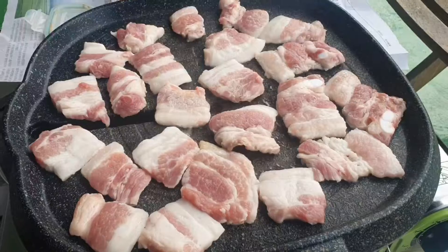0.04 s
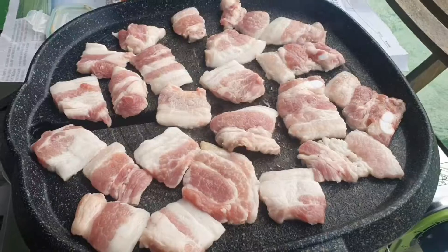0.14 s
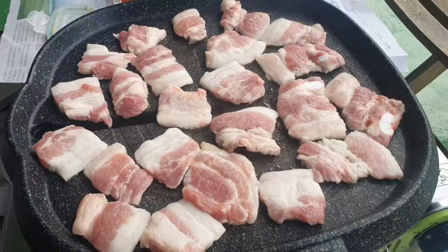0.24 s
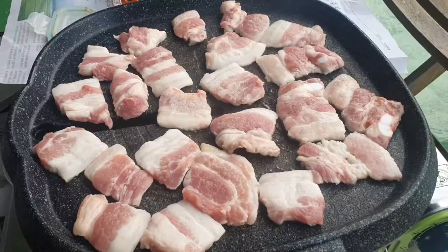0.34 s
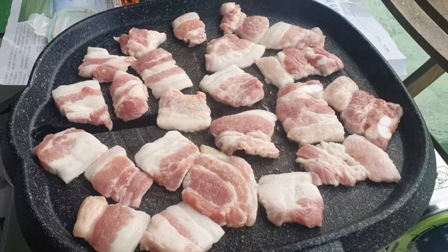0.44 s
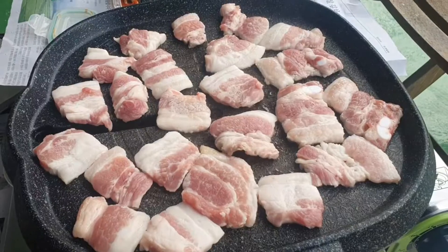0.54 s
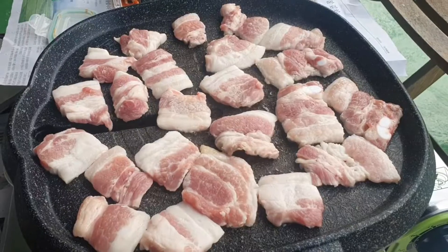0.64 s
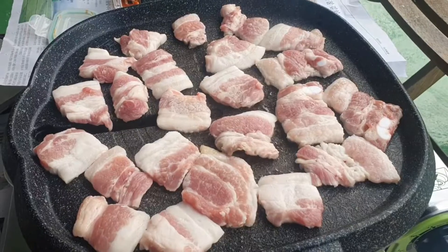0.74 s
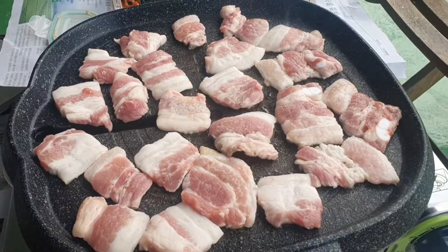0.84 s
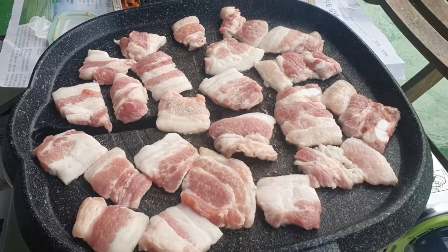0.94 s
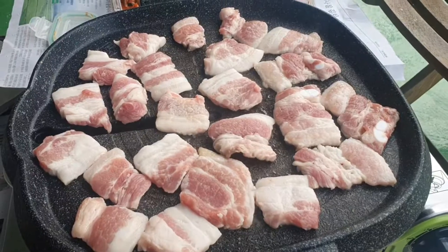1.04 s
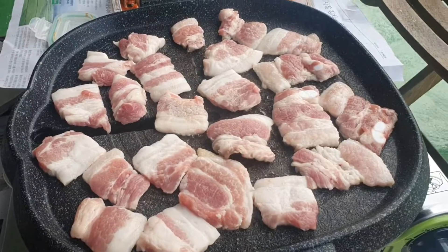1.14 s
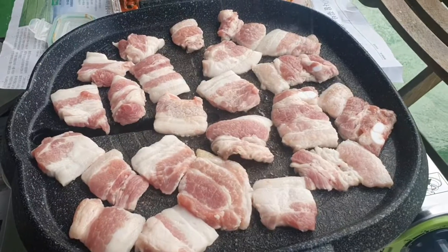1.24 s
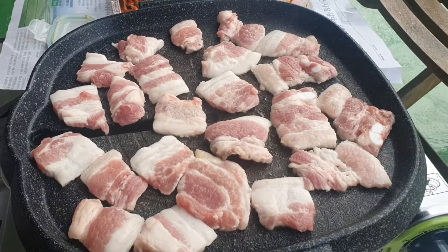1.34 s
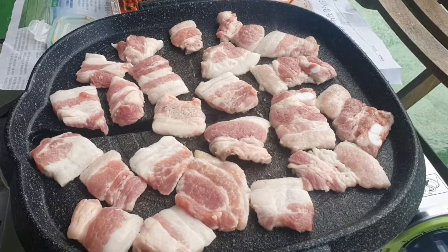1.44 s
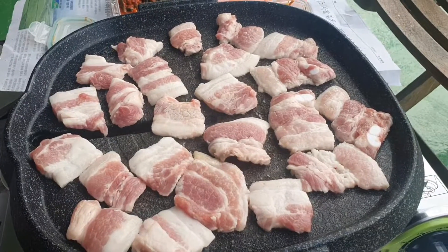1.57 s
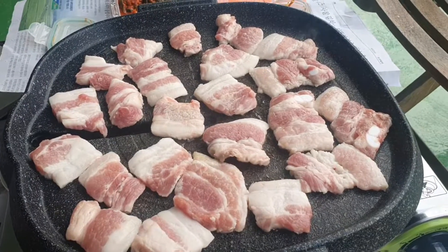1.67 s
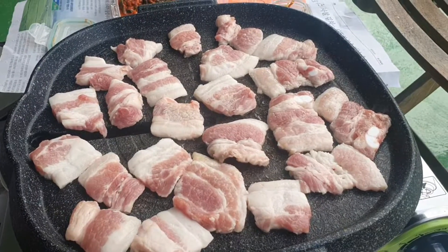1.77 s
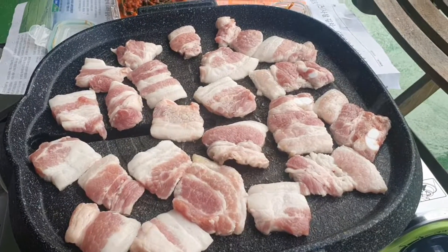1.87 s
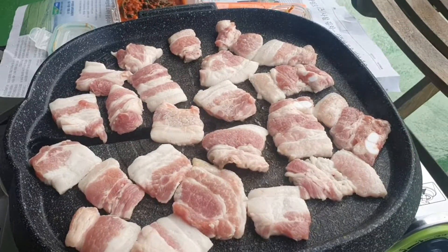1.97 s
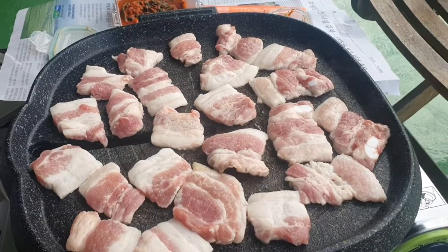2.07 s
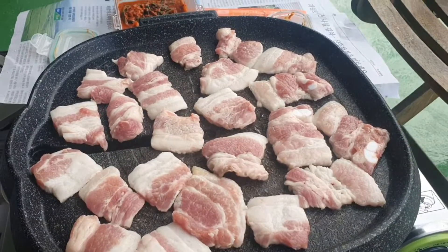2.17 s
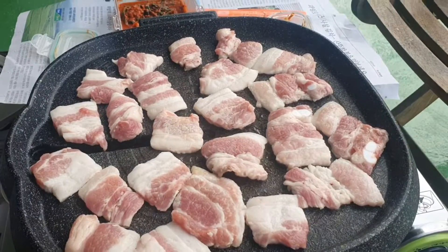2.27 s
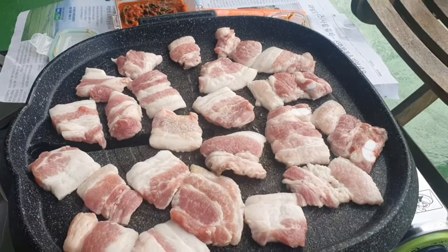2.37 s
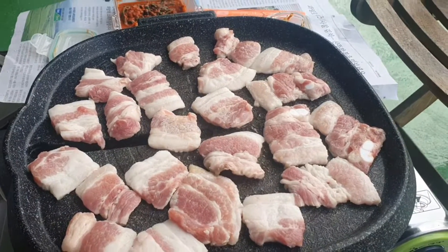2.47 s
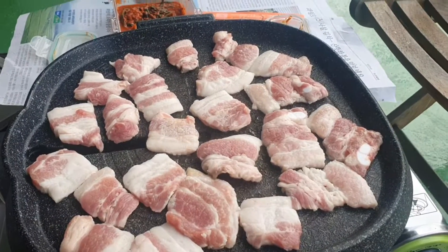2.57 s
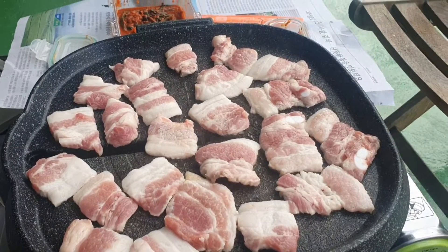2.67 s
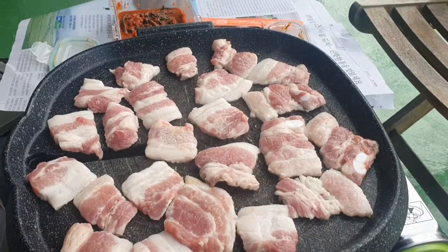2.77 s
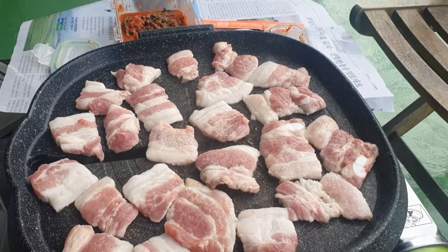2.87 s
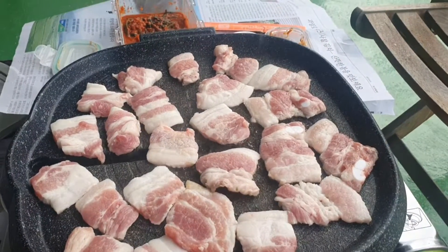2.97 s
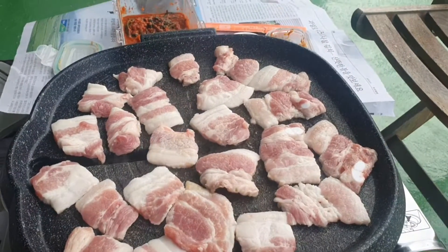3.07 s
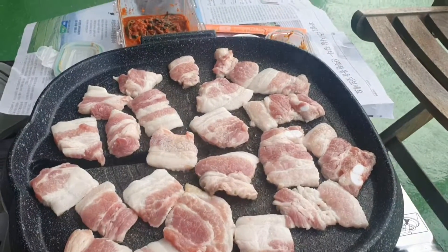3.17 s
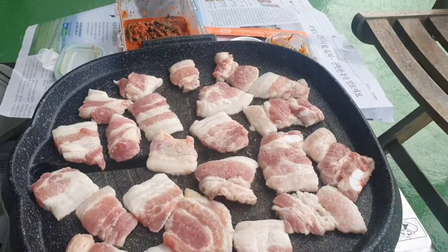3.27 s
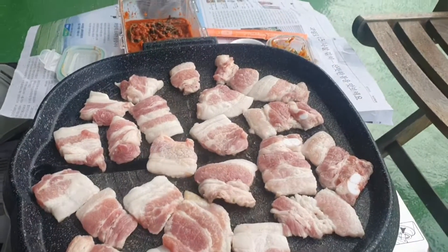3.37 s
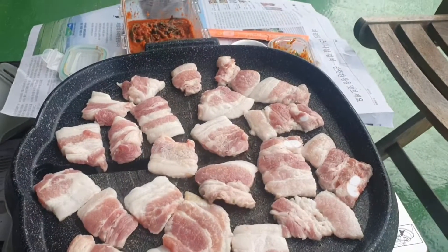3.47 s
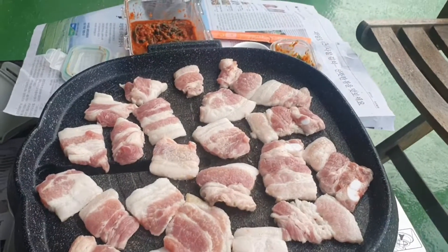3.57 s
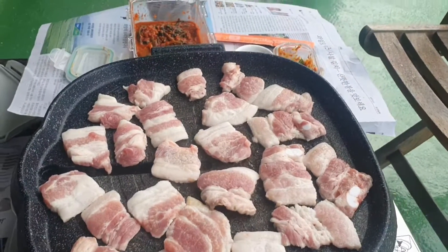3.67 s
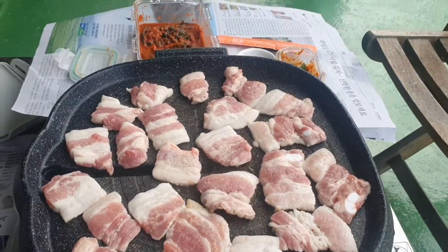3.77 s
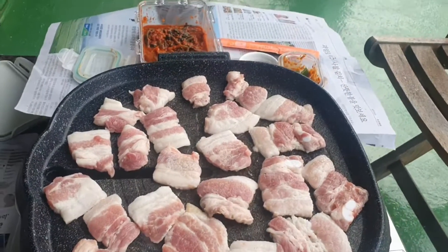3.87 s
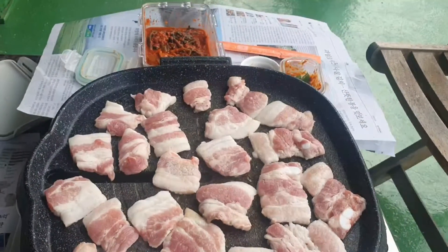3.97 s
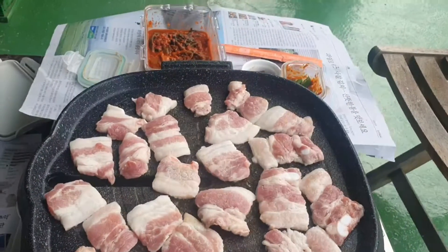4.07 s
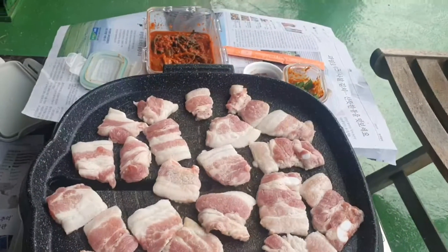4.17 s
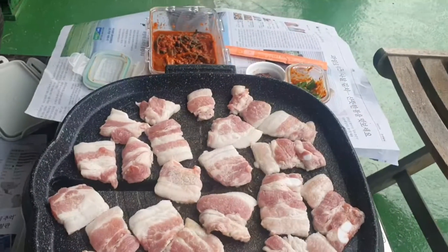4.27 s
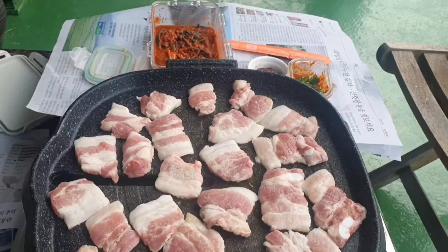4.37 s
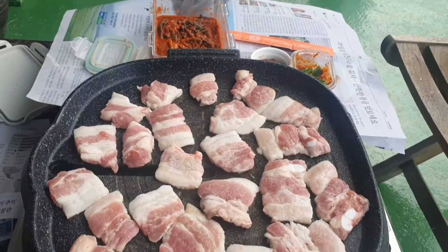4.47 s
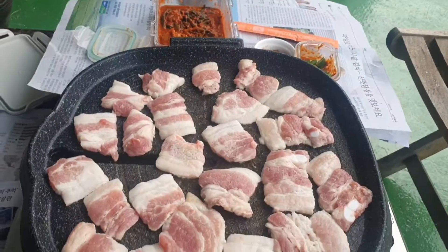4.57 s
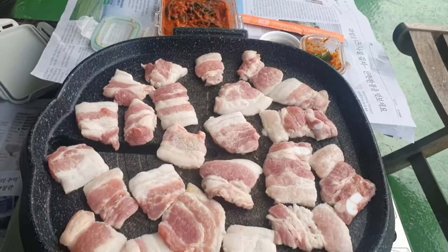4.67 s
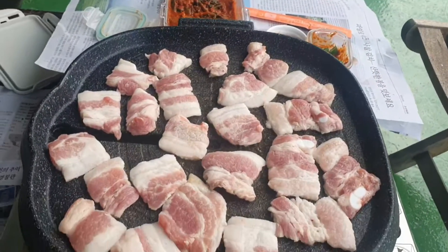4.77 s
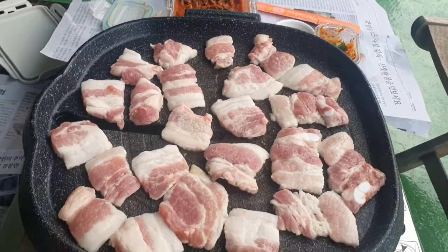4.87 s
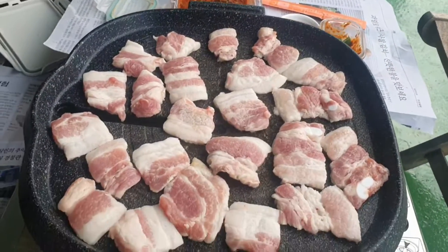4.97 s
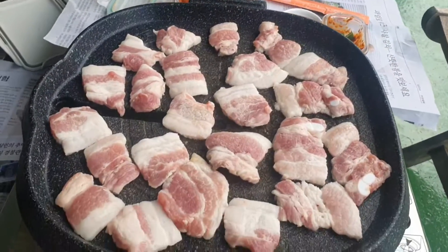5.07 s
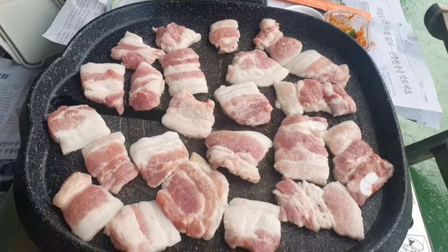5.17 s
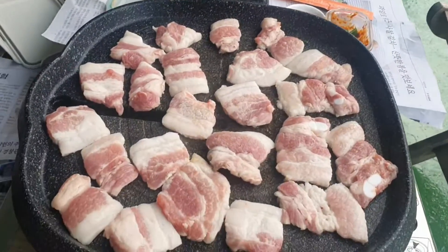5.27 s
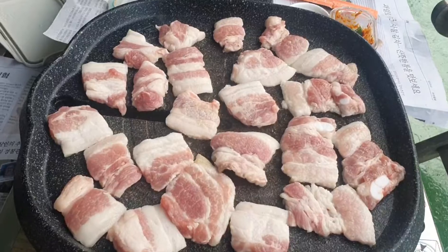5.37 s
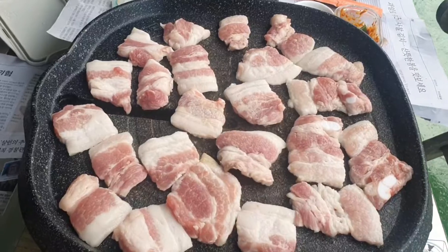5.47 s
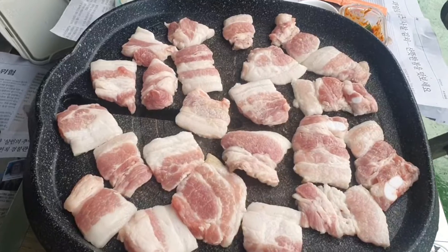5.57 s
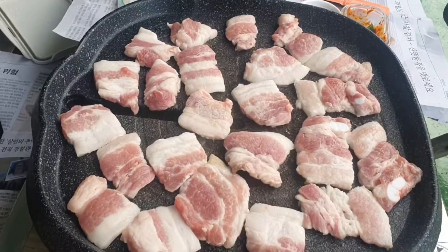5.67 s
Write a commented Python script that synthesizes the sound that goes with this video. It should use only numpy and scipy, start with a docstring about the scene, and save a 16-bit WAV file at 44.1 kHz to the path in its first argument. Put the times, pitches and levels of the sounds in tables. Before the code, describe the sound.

Pork belly slices fry on a stone pan outdoors, a steady bright hiss with fine crackles and spits that grow sharper midway.

```python
"""A near-silent instant, then the fizz of pork belly slices on a stone grill pan outdoors cuts in.
It is countless tiny steam bursts, heard close up through a two-port microphone; the sound drops out once.
Larger bubbles ring in the fat under the slices, slow ones plop, and a low outdoor rumble lies beneath.
Single drops spit as short damped rings; later, trapped steam squirts out as fading bubbly rushes."""
import sys
import numpy as np
from scipy import signal
from scipy.fft import rfft, irfft, next_fast_len
from scipy.io import wavfile
from scipy.ndimage import uniform_filter1d, minimum_filter1d, map_coordinates

SR = 44100
rng = np.random.default_rng(int(sys.argv[2]) if len(sys.argv) > 2 else 0)


def put_to_file(sound):
    """Save the sound as 16-bit audio at rate SR, in the file named by the first command-line argument."""
    columns = np.atleast_2d(sound).T  # one column per channel
    safe = np.clip(columns, -1, 1)
    whole_steps = np.round(safe * 32767)
    wavfile.write(sys.argv[1], SR, whole_steps.astype(np.int16))


N = 252252

# Levels marked "drive" are offset in the layer's function.
# sound cuts in, drops out once: [time_s, gain_db]
HEARD_GAIN = [(.143, -59), (.145, 2), (.431, 1), (.434, -30), (.453, -36), (.456, 1.5)]
# how hard the whole pan fries: [time_s, drive_db]
FRYING_DRIVE = [(0.18, -34), (0.42, -36.0), (0.66, -34.5), (0.98, -35.5), (1.14, -33), (1.22, -33.5),
                (1.62, -29.0), (2.62, -28.0), (2.7, -29.5), (2.94, -28.5), (3.02, -24.5), (3.1, -30.0),
                (3.74, -31.0), (3.9, -33), (4.02, -31), (4.06, -31.5), (4.98, -28.0), (5.68, -27.5)]
# fizz spectrum: [frequency_hz, density_db_per_hz]
FIZZ_SPECTRUM = [(300, -27), (600, -8.5), (1000, -9), (1500, -4.5), (2200, -1.5), (3500, 2.5), (5400, -3),
                 (6400, -1.5), (7400, -5.5), (8400, -1.5), (11500, -1), (13500, -1.5), (15700, -4)]
# how hard the fat boils beneath the slices: [time_s, drive_db]
BUBBLING_DRIVE = [(0.18, -38.5), (1.26, -45.5), (1.46, -34), (1.7, -38.5), (1.82, -29), (2.1, -38),
                  (2.22, -25.5), (2.38, -36.5), (2.82, -26), (2.94, -31.5), (3.18, -27), (3.5, -34.5),
                  (3.62, -31.5), (4.1, -41.0), (4.46, -32.5), (5.5, -42), (5.58, -27.5), (5.68, -35.5)]
# hollows between meat and pan: [resonance_hz, width_hz, gain_db]
HOLLOW_MODES = [(1770, 490, -8), (2830, 290, -2), (3370, 146, 3), (3640, 320, -8), (4210, 490, 0.5)]
# plop filter, the fat carries no bass: [frequency_hz, gain_db]
PLOP_GAIN = [(300, -46), (480, -22), (750, -1.5), (1000, -4.5), (4000, 2.5)]
# stereo lean of the frying, positive is left: [frequency_hz, left_minus_right_db]
STEREO_TILT = [(60, -9), (110, 2), (200, -11), (380, -10), (700, -0.5), (1290, -2), (2380, -1.0),
               (4400, -1.5), (8120, 2.5), (15000, 3.0)]
# outdoor rumble: [time_s, drive_db]
RUMBLE_DRIVE = [(0.18, -46.5), (0.78, -47.5), (1.92, -39.5), (2.64, -40.5), (2.82, -44.5), (4.14, -44),
                (4.92, -39.5), (5.68, -40)]
# rumble spectrum: [frequency_hz, density_db_per_hz]
RUMBLE_SPECTRUM = [(15, -30), (30, -9), (45, -1.5), (90, 0.5), (125, -.5), (152, -6), (188, -3.5),
                   (260, -8), (400, -10.5), (500, -16), (800, -14.5), (1300, -22), (2500, -31)]
# loudest bursting drops, ring drive as rms over 3 ms:
# [start_s, ring_drive_db, ring_hz, plop_over_ring_db, plop_hz, snap_over_ring_db]
LOUD_SPITS = [(0.798, -37, 3910, -8, 1520, 7), (0.823, -33.5, 3180, -2, 1420, 1),
              (1.103, -41, 3850, -1, 1550, 13), (1.429, -30, 3720, -4, 940, 8.5),
              (1.462, -23.5, 3680, -7, 1440, -7), (1.601, -26, 3650, -10, 1580, 6),
              (1.696, -30.5, 4610, -8, 1500, 9.5), (1.757, -26, 3390, 0, 1270, 1),
              (1.855, -32, 2970, -4, 1780, -3), (1.984, -27, 3000, -1, 1370, -9),
              (2.164, -28, 3070, -5, 1490, 0), (2.269, -25, 4120, -13, 1370, 2),
              (2.457, -12, 4600, -13, 1110, -6), (2.468, -20, 4270, 0, 1260, -6),
              (2.539, -25, 3860, -7, 1470, -5), (2.641, -22.5, 3230, -11.5, 1640, -8),
              (2.683, -22, 3570, -15, 1740, -1.5), (2.729, -5.5, 3130, -10.5, 1590, -11),
              (2.806, -22, 3570, -12, 1570, -3), (2.971, -26.5, 3160, -1.5, 1480, 1),
              (2.985, -28.5, 3290, -1, 1430, 5), (3.02, -15.5, 3600, -11, 1690, -6),
              (3.058, -12.5, 3670, -22, 1640, -4), (3.118, -26, 3510, -3.5, 1270, -8),
              (3.2, -21.5, 3490, -8.5, 1610, -1), (3.328, -17.5, 3370, -12.5, 1650, -18),
              (3.387, -21.5, 3040, -4, 1480, -7), (3.394, -25, 3360, -16, 1730, -1),
              (3.644, -22.5, 3310, -14, 1590, -16), (4.015, -32.5, 4290, -3, 1450, 10.5),
              (4.296, -21, 2530, -19, 1930, -1), (4.332, -25, 3460, -14, 1640, -8),
              (4.429, -21.5, 3580, -9, 1620, -6), (4.476, -19, 3340, -17, 1690, -13),
              (4.603, -24, 3500, -18, 1570, -13), (4.69, -33, 3160, 6.5, 1130, 7),
              (4.829, -19.5, 3320, -14, 1600, -12), (4.922, -27, 2740, -3, 1390, -6),
              (4.969, -27.5, 3930, -11, 1500, 3.5), (5.553, -25, 3520, -10, 1400, -1)]
# steam from under a slice: [start_s, level_db, pitch_hz, width_hz, fall_time_s, left_minus_right_db]
STEAM_SQUIRTS = [(1.835, -28.5, 3300, 1500, .045, 0), (2.466, -21, 4200, 4000, 0.023, -5),
                 (2.635, -27, 3430, 700, 0.022, -8), (2.737, -12, 3180, 900, 0.023, -6.5),
                 (3.020, -23.5, 3800, 1100, 0.041, 0), (3.058, -25.5, 3550, 500, 0.085, -3),
                 (3.328, -25.5, 3500, 600, 0.035, -4), (3.386, -27.5, 3500, 800, 0.026, 0),
                 (3.633, -28, 3450, 500, 0.037, 0)]

TOP_HZ = 15850
FIZZ_OVER_FRYING_DB = 0.46
# plop level at the reference drive; dB more per dB of frying
SPUTTER_DB, SPUTTER_REF_DRIVE_DB, SPUTTER_DB_PER_DB = -48.5, -29.5, 0.87
SPUTTER_SWING_DB, SPUTTER_SWINGS_PER_S = 2.1, 7
SMALL_SPITS_PER_S = 6
# ring drive over frying drive; plop and snap over ring
SMALL_RING_DRIVE_DB, SMALL_PLOP_DB, SMALL_SNAP_DB = -4, -8, -1
SMALL_RING_HZ, SMALL_PLOP_HZ = 3550, 1600
SMALL_SCATTER_DB, SMALL_SCATTER_OCTAVES = 1.8, .22
RIGHT_PORT_DELAY_S = .00021
SPIT_LEFT_MINUS_RIGHT_DB, SNAP_LEFT_MINUS_RIGHT_DB = 2, 6
SPIT_HOLLOW_DB = -9


def amp(db):
    """Decibels to gain."""
    return 10 ** (np.asarray(db) / 20)


def unit(x):
    """Scale to rms 1."""
    return x / np.sqrt(np.mean(x ** 2) + 1e-20)


def along(points, hz):
    """Interpolate (Hz, value) points on a log-frequency axis."""
    f, v = np.transpose(points)
    return np.interp(np.log(hz + 1), np.log(f + 1), v)


def curves(rows):
    """One value per sample for each column after the time."""
    s, *cols = np.transpose(rows)
    return [np.interp(np.arange(N) / SR, s, c) for c in cols]


def wobble(knots_per_s):
    """Smooth random curve."""
    knots = rng.standard_normal(int(N * knots_per_s / SR) + 4)
    return map_coordinates(knots, [np.arange(N) * knots_per_s / SR])


def filtered(x, response):
    """x times a complex response of frequency."""
    n = x.shape[-1]
    m = next_fast_len(n + 8192)
    spectrum = rfft(x, m) * response(np.fft.rfftfreq(m, 1 / SR))
    return irfft(spectrum, m)[..., :n]


def coloured(x, points):
    """Causal minimum-phase filter with the gain of the (Hz, dB) points: attacks stay sharp."""
    size = 4096
    gain = amp(along(points, np.fft.rfftfreq(size, 1 / SR)))
    cepstrum = irfft(np.log(gain + 1e-6))
    cepstrum[1:size // 2] *= 2
    cepstrum[size // 2 + 1:] = 0
    impulse = irfft(np.exp(rfft(cepstrum)))
    return signal.fftconvolve(x, impulse[None], axes=1)[:, :x.shape[1]]


def bandpassed(x, low_hz, high_hz, order):
    """Butterworth band-pass."""
    sos = signal.butter(order, [low_hz, high_hz], "bandpass", fs=SR, output="sos")
    return signal.sosfilt(sos, x)


def resonance(f, hz, width_hz):
    """Causal response of one resonance."""
    return 1j * f * width_hz / (hz * hz - f * f + 1j * f * width_hz)


def hollows(f):
    """Response of the hollows between meat and pan: parallel resonances."""
    return sum(amp(db) * resonance(f, hz, width_hz) for hz, width_hz, db in HOLLOW_MODES)


def sides(left_minus_right_db):
    """Left and right gain for a level difference."""
    return amp(np.array([[.5], [-.5]]) * left_minus_right_db)


def add(track, start_s, sound):
    """Mix a stereo sound into the track."""
    part = track[:, round(start_s * SR):][:, :sound.shape[1]]
    part += sound[:, :part.shape[1]]


def port_lag(count):
    """Samples by which each spot of the pan reaches the right port later."""
    return np.round(np.clip(rng.normal(10.5, 4.2, count), 0, 30)).astype(int)


def rim(x, wet_db, t60_s):
    """Rim, meat and table scatter a short, different echo to each port."""
    t = np.arange(SR // 20) / SR
    tail = rng.standard_normal((2, len(t))) * amp(-60 * t / t60_s) * (t > .0005)
    tail /= np.linalg.norm(tail, axis=1, keepdims=True)
    return x + amp(wet_db) * signal.fftconvolve(x, tail, axes=1)[:, :x.shape[1]]


def ticks(per_s, size_db):
    """Films of fat snapping at random moments: bare clicks of uneven size; stereo, rms 1."""
    count = int(per_s * N / SR)
    start = rng.integers(0, N, count)
    strength = amp(size_db * np.minimum(rng.exponential(size=count), 3))
    strength = strength * rng.choice([-1, 1], count)
    ports = [start, start + port_lag(count)]
    return unit(np.array([np.bincount(at, strength, N)[:N] for at in ports]))


def grains(per_s, hz, spread, cycles, size_db, size=128):
    """Bubbles bursting: damped oscillations, mostly small, a few large; stereo, rms 1."""
    count = int(per_s * N / SR)
    start = rng.integers(0, N, count)
    pitch_hz = np.minimum(hz * np.exp(spread * rng.standard_normal((count, 1))), TOP_HZ)
    strength = amp(size_db * np.minimum(rng.exponential(size=(count, 1)), 4))
    turns = pitch_hz * np.arange(size) / SR
    pulsing = strength * hz / pitch_hz * np.sin(2 * np.pi * turns) * np.exp(-turns / cycles)
    waves = np.gradient(pulsing, axis=1)  # pressure is the rate of change of the pulsing
    waves[:, 0] /= 2
    ports = [start, start + port_lag(count)]
    spans = [(at[:, None] + np.arange(size)).ravel() for at in ports]
    return unit(np.array([np.bincount(span, waves.ravel(), N)[:N] for span in spans]))


def fizz(level_db):
    """Tiny steam bursts: sharp crackles and high pips over a hiss of countless smaller ones."""
    hiss = unit(rim(ticks(per_s=16000, size_db=2.0), wet_db=-7.5, t60_s=0.11))
    hiss = hiss * amp(0.65 * wobble(90))
    crackle = unit(rim(ticks(per_s=220, size_db=2.0), wet_db=-2.0, t60_s=0.015))
    pips = grains(per_s=300, hz=11600, spread=0.26, cycles=0.86, size_db=3.5, size=32)
    pips = unit(rim(pips, wet_db=0, t60_s=0.011))
    frying = unit(coloured(hiss + amp(-8.5) * crackle + amp(-9.0) * pips, FIZZ_SPECTRUM))
    return amp(level_db + 0.54 * wobble(7)) * frying


def bubbling(drive_db):
    """Larger bubbles burst in the fat and ring in the hollows under the slices."""
    bursts = grains(per_s=520, hz=3500, spread=0.29, cycles=0.82, size_db=4.0)
    rung = unit(filtered(bursts, hollows))
    level = amp(drive_db - 4.5 + 1.0 * wobble(30))
    return level * unit(rim(rung + 0.62 * bursts, wet_db=-3, t60_s=0.073))


def sputter(frying_db):
    """The slowest bubbles give soft, low plops, in clumps; they follow the frying."""
    bursts = grains(per_s=350, hz=1620, spread=.35, cycles=0.53, size_db=4.5, size=320)
    plops = unit(coloured(bursts, PLOP_GAIN))
    level_db = SPUTTER_DB + SPUTTER_DB_PER_DB * (frying_db - SPUTTER_REF_DRIVE_DB)
    level_db = level_db + SPUTTER_SWING_DB * wobble(SPUTTER_SWINGS_PER_S)
    return amp(level_db) * rim(plops, wet_db=-4, t60_s=.03)


def rumble():
    """Low outdoor background: shaped noise, nearly the same at both ports."""
    drive_db, = curves(RUMBLE_DRIVE)
    air = rng.standard_normal(N) + 0.29 * rng.standard_normal((2, N))
    return amp(drive_db - 0.65) * unit(filtered(air, lambda f: amp(along(RUMBLE_SPECTRUM, f))))


def small_spits(frying_db):
    """Lesser drops at random moments, louder with harder frying; columns as in LOUD_SPITS."""
    count = int(SMALL_SPITS_PER_S * N / SR)
    at = rng.integers(0, N, count)
    loudness, pitch, plop, snap = rng.standard_normal((count, 4)).T
    # ring and plop share one random pitch shift, whatever the loudness
    pitch_ratio = 2 ** (SMALL_SCATTER_OCTAVES * pitch)
    return np.column_stack([
        at / SR,
        frying_db[at] + SMALL_RING_DRIVE_DB + SMALL_SCATTER_DB * loudness,
        SMALL_RING_HZ * pitch_ratio,
        SMALL_PLOP_DB + SMALL_SCATTER_DB * plop,
        SMALL_PLOP_HZ * pitch_ratio,
        SMALL_SNAP_DB + SMALL_SCATTER_DB * snap])


def sized(wave, db):
    """Scale a short burst so its energy equals that level held for 3 ms."""
    return amp(db) * wave * np.sqrt(.003 * SR / np.sum(wave ** 2))


def spits(drops):
    """A drop bursts: its skin snaps, the cavity and the hollows ring for a few cycles, the fat plops."""
    track, t = np.zeros((2, N)), np.arange(SR // 20) / SR
    for start_s, ring_db, ring_hz, plop_db, plop_hz, snap_db in drops:
        spray = 0.15 * rng.standard_normal(len(t)) * np.exp(-t / 0.00081)
        crack = (t == 0) + spray  # one break, then a short spray
        plop = bandpassed(crack, plop_hz / 2.15, plop_hz * 1.55, order=3)
        ring = bandpassed(crack, ring_hz / 1.3, ring_hz * 1.15, order=1)
        ring = bandpassed(ring, 1900, 8300, order=2)
        ring = ring + amp(SPIT_HOLLOW_DB) * filtered(ring, hollows)
        snap = bandpassed(crack, 6000, 14500, order=2)
        body = sides(SPIT_LEFT_MINUS_RIGHT_DB) * (sized(plop, plop_db) + sized(ring, 0))
        left, right = body + sides(SNAP_LEFT_MINUS_RIGHT_DB) * sized(snap, snap_db)
        pair = np.array([left, np.roll(right, round(RIGHT_PORT_DELAY_S * SR))])
        add(track, start_s, amp(ring_db - 1.3) * rim(pair, wet_db=-7.5, t60_s=0.019))
    return track


def squirts():
    """Steam escapes through one narrow gap: a fading rush with a fast train of bubbles in it."""
    track, t = np.zeros((2, N)), np.arange(SR // 4) / SR
    for start_s, level_db, hz, width_hz, fall_s, balance_db in STEAM_SQUIRTS:
        train = grains(per_s=2600, hz=hz, spread=0.47, cycles=0.7, size_db=2.5, size=48)[:, :len(t)]
        noise = rng.standard_normal(train.shape)
        rush = unit(filtered(noise, lambda f: resonance(f, hz, 2 * width_hz)))
        jet = unit(filtered(train + 0.63 * rush, lambda f: resonance(f, hz, width_hz)))
        envelope = np.exp(-t / fall_s) * (1 - np.exp(-t / 0.0014))
        add(track, start_s, amp(level_db) * sides(balance_db) * jet * envelope)
    return track


def scene():
    """The pan in front of the background; the treble of its frying leans left."""
    frying_db, = curves(FRYING_DRIVE)
    bubbling_db, = curves(BUBBLING_DRIVE)
    frying = fizz(frying_db + FIZZ_OVER_FRYING_DB) + bubbling(bubbling_db) + sputter(frying_db)
    frying = filtered(frying, lambda f: sides(along(STEREO_TILT, f)))
    pan = frying + spits(LOUD_SPITS) + squirts()
    return pan + rumble() + spits(small_spits(frying_db))


def limited(x, ceiling_db, release_db_per_s, size=200):
    """Look-ahead limiter: ducks for peaks over the ceiling, then recovers at a steady dB rate."""
    over_db = np.maximum(20 * np.log10(np.abs(x).max(axis=0) + 1e-9) - ceiling_db, 0)
    ramp_db = release_db_per_s * np.arange(N) / SR
    cut_db = np.maximum.accumulate(over_db + ramp_db) - ramp_db
    gain_db = uniform_filter1d(minimum_filter1d(-cut_db, 2 * size), size)
    return x * amp(gain_db)


def record(dry):
    """The sound cuts in, drops out once, is limited and ends steeply at TOP_HZ."""
    heard_db, = curves(HEARD_GAIN)
    held = limited(dry * amp(heard_db), ceiling_db=-2.5, release_db_per_s=176)
    return filtered(held, lambda f: 1 / (1 + (f / TOP_HZ) ** 300))


dry = scene()
out = record(dry)
put_to_file(out)
```